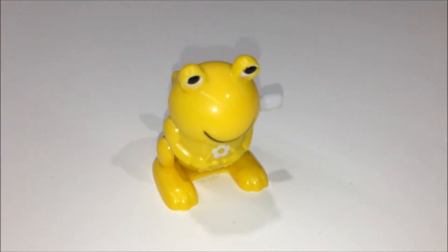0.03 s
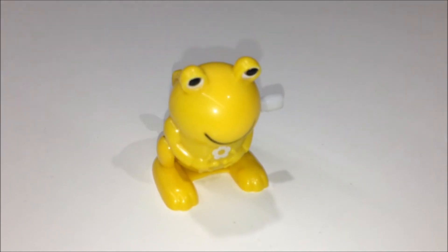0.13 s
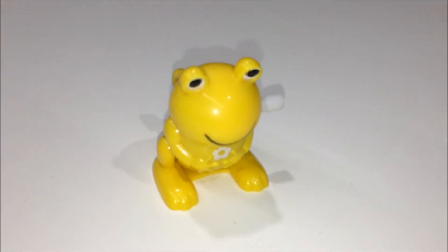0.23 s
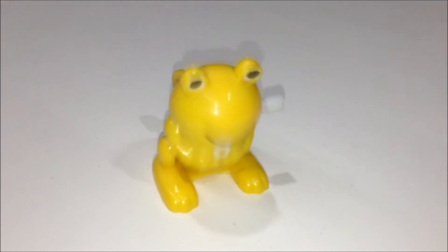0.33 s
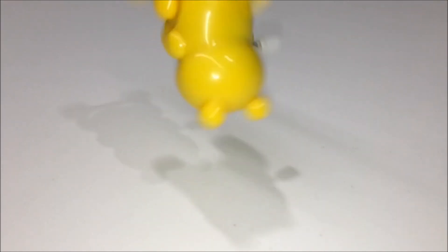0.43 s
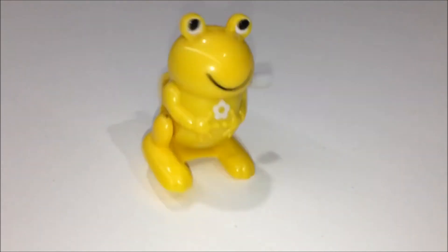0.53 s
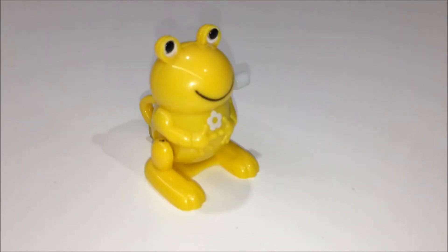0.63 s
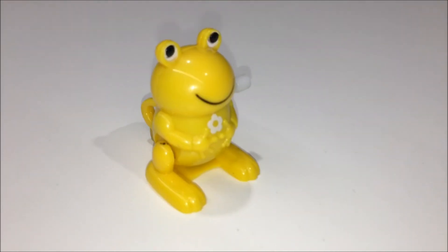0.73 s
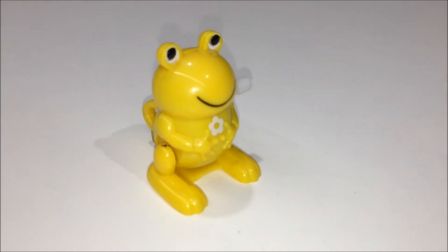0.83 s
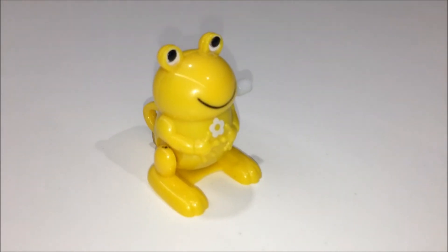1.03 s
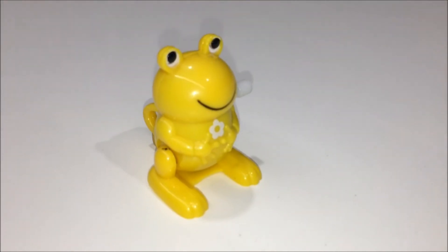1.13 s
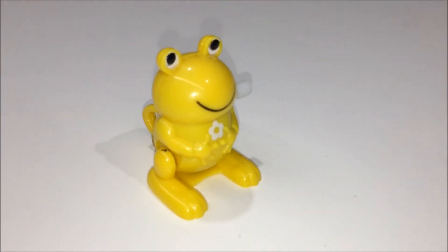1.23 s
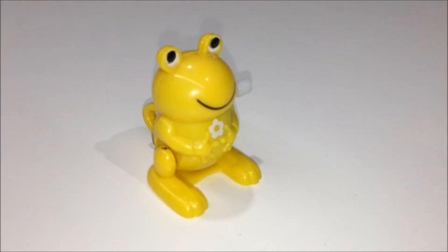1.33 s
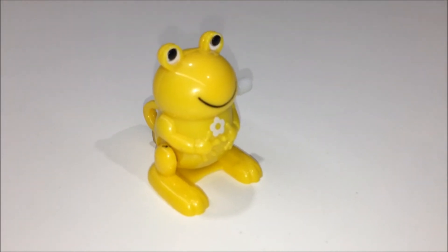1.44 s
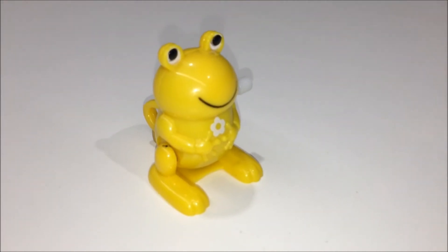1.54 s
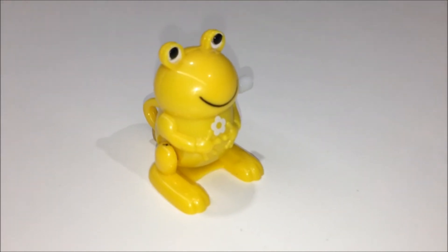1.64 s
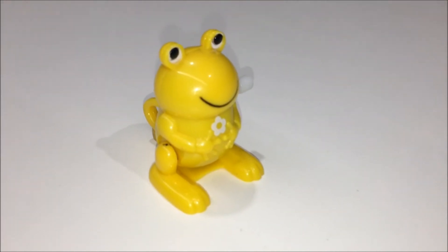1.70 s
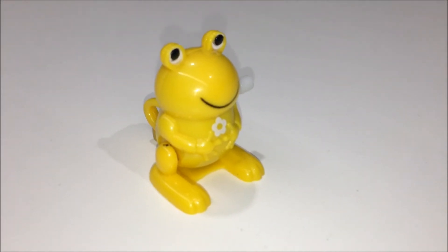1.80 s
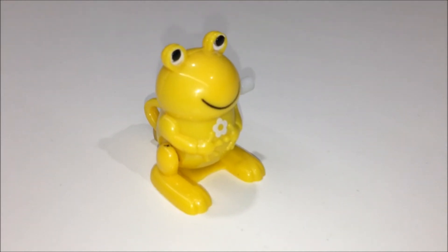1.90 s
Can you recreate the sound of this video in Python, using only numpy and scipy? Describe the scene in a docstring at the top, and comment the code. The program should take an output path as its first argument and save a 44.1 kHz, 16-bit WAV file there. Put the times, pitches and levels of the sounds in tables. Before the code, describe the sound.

Clockwork motor of a hollow plastic toy on a table, heard close in mono: rising raspy whirr, small snap, sharp landing knock with scattered ticks, fast hissy buzz, then a sagging slowdown in a quiet, small-sounding room.

```python
"""On a table in a quiet room, a small plastic wind-up frog does one hop, heard from close by in mono.
Its escapement ticks hundreds of times a second and so excites the resonances of the hollow shell: it
speeds up as the legs release, stays fast through the hop and the landing, and slows on loading the leg spring.
The snapping legs and the landing are clusters of noise contacts that also ring the tabletop's modes;
light taps are single filtered contacts. A short diffuse tail and coloured noise give the room."""
import sys
import numpy as np
from scipy import signal
from scipy.fft import rfft, irfft
from scipy.io import wavfile
from scipy.ndimage import map_coordinates

SR = 44100
rng = np.random.default_rng(int(sys.argv[2]) if len(sys.argv) > 2 else 0)


def wav_out(sig):
    """Save sig, one row per channel (or a flat mono array), as 16-bit PCM at SR to the path in sys.argv[1]."""
    wavfile.write(sys.argv[1], SR, np.round(np.clip(np.atleast_2d(sig).T, -1, 1) * 32767).astype(np.int16))


N = 85995

# Speed of the clockwork before its wobble. Each row: time in seconds, rate in escapement ticks per second.
CLOCKWORK_SPEED = [(0, 318), (.1, 380), (.18, 408), (.25, 470), (.35, 555), (.42, 570), (.5, 693),
                   (.56, 640), (.68, 735), (.92, 745), (1.2, 713), (1.47, 697), (1.53, 520), (1.59, 385),
                   (1.68, 375), (1.78, 333), (1.84, 243), (1.91, 228), (1.95, 174.5)]
# Shell resonances, legs folded. Each row: frequency in Hz, width in Hz, relative level in dB.
CROUCHED_MODES = [(1910, 235, -7), (3050, 300, -7.5), (3616, 600, -5), (4120, 270, 0), (5170, 420, -4.5),
                  (6990, 900, -3), (7490, 170, -2), (8670, 340, -2.5), (9520, 440, -9), (11070, 600, -3.5),
                  (12400, 300, -17), (12986, 382, -0.5)]
# Shell resonances in the air. Each row: frequency in Hz, width in Hz, relative level in dB.
AIRBORNE_MODES = [(1110, 53, -7), (1920, 145, 3.5), (3160, 690, -4.5), (4350, 420, -2), (5000, 340, 5),
                  (5620, 430, 1.5), (6240, 440, -3.5), (7530, 770, 1.5), (8800, 620, 5), (10700, 500, 1),
                  (11670, 200, 9.5), (12700, 444, 6), (14500, 600, 1.5), (15060, 350, 0)]
# Shell resonances, legs stretched. Each row: frequency in Hz, width in Hz, relative level in dB.
UPRIGHT_MODES = [(1125, 110, -11.5), (1936, 340, -5), (3293, 300, -2.5), (4230, 144, 0.5), (4643, 270, -7),
                 (5466, 400, -2.5), (6110, 200, -15.5), (6790, 504, -1), (7990, 350, -1.5),
                 (8950, 520, 1.5), (11083, 450, -2), (12050, 253, -4), (13326, 490, 0.5), (15720, 500, 2.5)]
# Broad colour of the motor, crouched and in the air. Each row: frequency in Hz, relative level in dB.
CROUCHED_COLOUR = [(100, -4), (400, -12), (850, 6.5), (1400, 2), (2500, -4), (3300, 0.5), (4000, -0.5),
                   (6000, -1.5), (7400, 1), (9700, 1), (10400, -3.5), (11100, 0.5), (13000, -1), (16000, 2)]
# Broad colour while racing after the landing. Each row: frequency in Hz, relative level in dB.
RACING_COLOUR = [(100, -6), (400, -10), (800, -2), (1400, 0.5), (2000, -0.5), (2600, -5.5), (4000, -2),
                 (9700, 0), (10350, -2.5), (10900, 0), (16000, -0.5)]
# Broad colour while loading the leg spring. Each row: frequency in Hz, relative level in dB.
LOADED_COLOUR = [(100, -1), (600, -3), (1100, -1.5), (1900, -1.5), (2500, -5), (3300, -1.5), (4400, 0.5),
                 (4850, 2.5), (5450, 4.5), (6000, 3), (7000, -0.5), (9600, -2), (10400, -4), (11200, 0.5),
                 (16000, -5.5)]
# Hard blows: the legs snapping out, then the landing. Each row: start in seconds, length of the clatter
# in seconds, level in dB, tabletop level in dB, brightness in dB per octave, change over the clatter in dB.
HARD_BLOWS = [(0.5209, 0.008, -19, -47.5, 0.36, -20), (0.6682, 0.0079, -11.5, -27, -0.3, -3)]
# Colour of the blows before their own brightness. Each row: frequency in Hz, relative level in dB.
BLOW_COLOUR = [(60, -33), (200, -11), (450, -9.5), (720, -15.5), (900, -12), (1350, -6), (1900, -1),
               (2500, -14.5), (3300, -7), (4100, -6), (5500, -12.5), (6850, -2), (8650, 2), (10500, -4),
               (13400, -2.5), (16000, -15.5)]
# Light taps of feet and joints. Each row: start in seconds, level in dB, centre in Hz,
# distance from the centre to half gain in octaves, decay in seconds.
LIGHT_TAPS = [(0.5115, -29.5, 2400, 1.2, 0.0025), (0.6574, -27, 7700, 0.42, 0.00117),
              (.6595, -37.5, 1730, 1.1, 0.0046), (0.7123, -37, 2210, 0.72, 0.0015),
              (0.7374, -25, 3970, 0.52, 0.0011), (0.736, -36, 1700, 0.36, 0.0063),
              (0.7617, -16, 9400, 0.99, 0.00026), (0.762, -35.5, 1650, 0.68, 0.00263),
              (0.7899, -27, 5600, .3, 0.00078)]
# Modes of the tabletop. Each row: frequency in Hz, relative level in dB, time to decay by 60 dB in seconds.
TABLE_MODES = [(124.2, -8, 0.67), (175, 2, 0.5), (199, 0, 0.41), (236, -10, 0.41), (283, 4, 0.31),
               (334, -5, 0.34), (343.3, 3.5, 0.34), (419, -7.5, 0.47), (566.9, 3.5, 0.18), (700, -1, .1),
               (830, -20, 0.19)]
# Colour of the tabletop's knock. Each row: frequency in Hz, relative level in dB.
THUD_COLOUR = [(30, -37), (100, -18), (200, 5), (500, 4), (900, -7), (1400, -1.5), (2500, -19.5),
               (8000, -46)]
# Colour of the room air. Each row: frequency in Hz, relative level in dB.
AIR_COLOUR = [(25, -15), (60, -8.5), (110, -8.5), (180, 2), (240, -4), (330, -10.5), (480, -17),
              (580, -11.5), (800, -18), (2000, -17), (6000, -18), (16000, -18)]

# Clockwork: reference speed in ticks per second, growth of loudness with speed, irregularity of the speed
FULL_SPEED, DB_PER_DOUBLING = 689.6, 10
WOBBLE, WOBBLE_S = .012, .04  # spread as a fraction of the speed, spacing of its random points
SCRAPE_S, GEAR_DB = .0015, -6.5  # decay of each tick's scrape; rub of the gears at full speed
TICK_JITTER = .1  # spread of the timing at full speed, as a fraction of the tick interval
LIMP_DB, TICK_SCATTER_DB = 2.5, .75  # strong against weak tick at full speed; random spread
HUM_DB = -57.5  # the tick rate itself, carried by the table; peak level at the starting speed

# Phases of the hop: times of the changes, length of each crossfade, shell levels at full speed
JUMP_S, LAND_S, LOAD_S, CHANGE_S = .505, .668, 1.5484, .02
CROUCHED_DB, AIRBORNE_DB, RACING_DB, LOADED_DB = -28.5, -30, -30.5, -30.5
SETTLE_DB, SETTLE_S = -3.5, .14  # the whirr is a little softer just after the landing
ECHO_LAG_S, HOP_LAG_S, ECHO_SHARE = .00014, .00018, .16  # least lag, extra lag at the top, amplitude

# Contacts, tabletop, room
RECONTACT_S, CONTACT_DECAY_S, CONTACT_SCATTER_DB = .0012, .00095, .5
THUD_DB, THUD_DECAY_S = -2, .0052  # dense, quickly damped modes of the top
BOOM_DB, BOOM_DECAY_S = -13, .043  # low reverberation of the knock
TABLE_CUT_HZ = 127  # the top radiates little below this
ROOM_DB, ROOM_T60_S, ROOM_DELAY_S = -13.5, .22, .0021
AIR_DB = -47
TOP_HZ = 15750


def undb(db):
    """Level and amplitude: 20 dB is a factor of ten in gain."""
    return 10 ** (np.asarray(db) / 20)


def unit(x):
    """Normalization: scale to a root mean square of 1."""
    return x / np.sqrt(np.mean(x ** 2))


def bins():
    """Spectral sampling: the frequencies in Hz on which filters are laid out, kept above zero."""
    return np.maximum(np.arange(N + 1) * SR / (2 * N), 1)


def tone(points):
    """Spectral envelope: gain interpolated in dB over logarithmic frequency."""
    hz, db = np.array(points).T
    return undb(np.interp(np.log(bins()), np.log(hz), db))


def resonances(rows):
    """Modal response: the powers of overlapping damped resonators add."""
    power = 0
    for hz, width, db in rows:
        detuning = (bins() ** 2 - hz ** 2) / (bins() * width)
        power = power + undb(db) ** 2 / (1 + detuning ** 2)
    return np.sqrt(power)


def ring(x, gain):
    """Minimum phase: a folded cepstrum makes the gain a causal filter that keeps white-noise power."""
    cepstrum = irfft(np.log(unit(gain) + 1e-6))
    cepstrum[1:N] *= 2
    cepstrum[N + 1:] = 0
    response = np.exp(rfft(cepstrum))
    return irfft(rfft(x, 2 * N) * response)[:N]


def fade(start, decay):
    """Free decay: a sudden start, then an exponential fall by 1/e per decay time."""
    age = np.arange(N) / SR - start
    return (age >= 0) * np.exp(-np.maximum(age, 0) / max(decay, 1 / SR))


def burst(envelope, seconds):
    """Contact noise: random impulses under an envelope, with the energy of a unit signal of that length."""
    x = envelope * rng.choice([-1, 1], N) * (1 + .5 * rng.standard_normal(N))
    return x * np.sqrt(abs(seconds) * SR / np.sum(x ** 2))


def motor(t):
    """Source and resonator: the escapement drives the shell, whose modes change with pose and load."""
    wobble = np.interp(t / WOBBLE_S, np.arange(N), rng.standard_normal(N))
    rate = np.interp(t, *np.array(CLOCKWORK_SPEED).T) * (1 + WOBBLE * wobble)
    drive = escapement(rate) * undb(DB_PER_DOUBLING * np.log2(rate / FULL_SPEED))

    def shell(modes, colour, db):
        """Forced vibration: the drive filtered by the shell's modes and broad colour."""
        return undb(db) * ring(drive, resonances(modes) * tone(colour))

    hum = undb(HUM_DB) * np.sin(2 * np.pi * np.cumsum(rate) / SR) * (rate[0] / rate) ** 2
    crouched = shell(CROUCHED_MODES, CROUCHED_COLOUR, CROUCHED_DB) + hum
    airborne = hop_echo(shell(AIRBORNE_MODES, CROUCHED_COLOUR, AIRBORNE_DB), t)
    racing = shell(UPRIGHT_MODES, RACING_COLOUR, RACING_DB) * undb(SETTLE_DB * fade(LAND_S, SETTLE_S))
    loading = shell(UPRIGHT_MODES, LOADED_COLOUR, LOADED_DB)

    # Each switch rises from 0 to 1 around its change of phase
    jumped, landed, loaded = (np.clip((t - at) / CHANGE_S + .5, 0, 1) for at in (JUMP_S, LAND_S, LOAD_S))
    return ((1 - jumped) * crouched + (jumped - landed) * airborne
            + (landed - loaded) * racing + loaded * loading)


def escapement(rate):
    """Periodic impact: ticks scrape and alternate in strength; speed adds raggedness and gear rub."""
    beat = np.flatnonzero(np.diff(np.floor(np.cumsum(rate) / SR)))
    rush = (rate / FULL_SPEED) ** 2
    late, size = rng.standard_normal((len(beat), 2)).T
    shift = TICK_JITTER * rush[beat] * late * SR / rate[beat]
    at = np.clip(beat + shift, 0, N - 1).astype(int)
    limp = LIMP_DB * rush[at] * (np.arange(len(at)) % 2 - .5)
    ticks = np.zeros(N)
    ticks[at] = undb(TICK_SCATTER_DB * size - limp) / np.sqrt(rate[at])  # even power at any rate
    # Energies of overlapping scrapes add
    scrape = np.sqrt(signal.lfilter([1], [1, -np.exp(-2 / (SCRAPE_S * SR))], ticks ** 2))
    gears = undb(GEAR_DB) * rush
    return unit(burst(np.hypot(unit(scrape), gears), 1))


def hop_echo(x, t):
    """Interference: the table mirrors the airborne toy, and the lag grows with its height."""
    flight = np.clip((t - JUMP_S) / (LAND_S - JUMP_S), 0, 1)
    height = 1 - (2 * flight - 1) ** 2  # parabola, 1 at the top
    lag = ECHO_LAG_S + HOP_LAG_S * height
    echo = map_coordinates(x, [(t - lag) * SR], mode="nearest")
    return (x + ECHO_SHARE * echo) / np.hypot(1, ECHO_SHARE)


def blows(t):
    """Repeated impact: loose plastic parts strike several times within milliseconds and shake the table."""
    out = 0
    for start, length, db, table_db, tilt_db, fall_db in HARD_BLOWS:
        sizes = undb(CONTACT_SCATTER_DB * rng.standard_normal(size=16))
        contacts = 0
        for late, size in zip(np.arange(0, length, RECONTACT_S), sizes):
            strength = size * undb(fall_db * late / length)
            contacts = contacts + strength * fade(start + late, CONTACT_DECAY_S)
        colour = tone(BLOW_COLOUR) * undb(tilt_db * np.log2(bins()))
        clatter = undb(db) * ring(burst(contacts, length), colour)
        out = out + clatter + undb(table_db) * tabletop(t, start)
    return out


def tabletop(t, start):
    """Plate vibration: a blow excites decaying modes, a dull thud and their low reverberation."""
    modes = 0
    for hz, db, t60 in TABLE_MODES:
        decay = fade(start, t60 / np.log(1000))
        modes = modes + undb(db) * decay * np.sin(2 * np.pi * hz * (t - start))
    thud = undb(THUD_DB) * burst(fade(start, THUD_DECAY_S), THUD_DECAY_S)
    boom = undb(BOOM_DB) * burst(fade(start, BOOM_DECAY_S), BOOM_DECAY_S)
    radiation = signal.butter(2, TABLE_CUT_HZ, "high", fs=SR, output="sos")
    return signal.sosfilt(radiation, .5 * modes + ring(thud + boom, tone(THUD_COLOUR)))


def taps():
    """Single impact: each light contact excites its own range of the shell's ring."""
    out = 0
    for start, db, hz, octaves, decay in LIGHT_TAPS:
        band = 1 / (1 + (np.log2(bins() / hz) / octaves) ** 4)
        out = out + undb(db) * ring(burst(fade(start, decay), 2 * decay), band)
    return out


def room(x):
    """Diffuse reverberation: convolution with decaying noise gives a faint, short tail from the walls."""
    tail = burst(fade(ROOM_DELAY_S, ROOM_T60_S / np.log(1000)), 1 / SR)
    return undb(ROOM_DB) * signal.fftconvolve(x, tail)[:N]


def room_air():
    """Stationary noise: a steady random signal with the colour of the room air."""
    return undb(AIR_DB) * ring(rng.standard_normal(N), tone(AIR_COLOUR))


def scene():
    """Superposition: toy, table, room tail and air add, the same in both channels."""
    t = np.arange(N) / SR
    toy = motor(t) + blows(t) + taps()
    return np.tile(toy + room(toy) + room_air(), (2, 1))


def record(dry):
    """Band limitation: a steep elliptic low-pass removes the extreme treble."""
    return signal.sosfilt(signal.ellip(12, .2, 80, TOP_HZ, fs=SR, output="sos"), dry)


dry = scene()
out = record(dry)
wav_out(out)
```